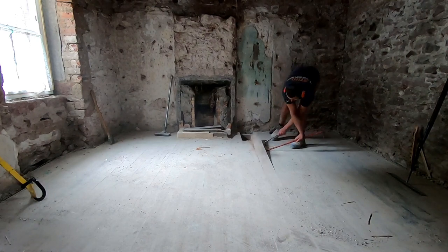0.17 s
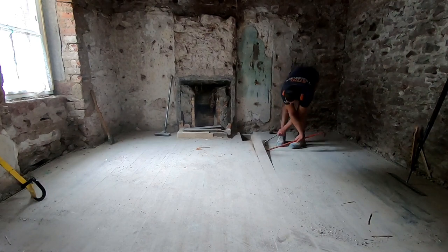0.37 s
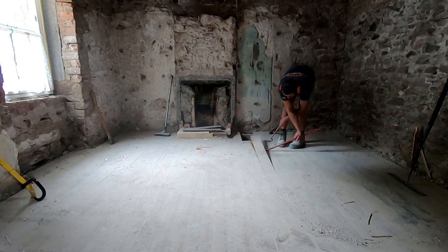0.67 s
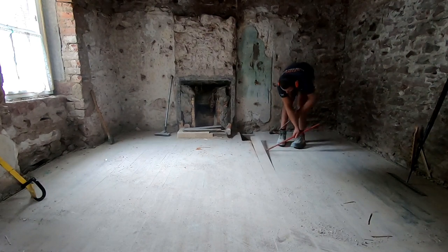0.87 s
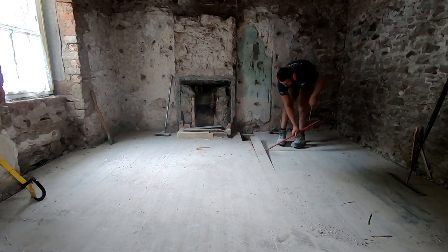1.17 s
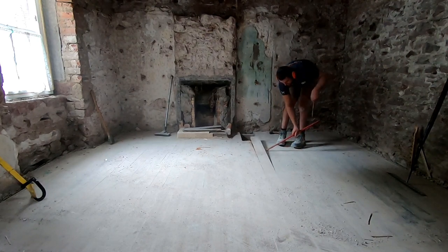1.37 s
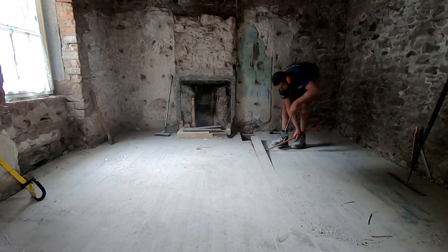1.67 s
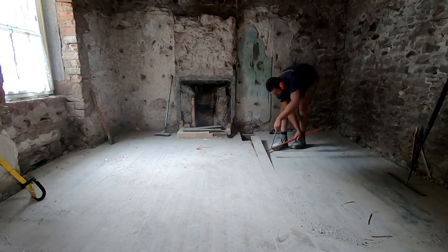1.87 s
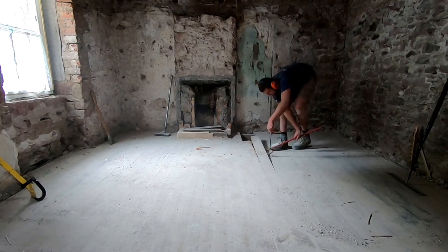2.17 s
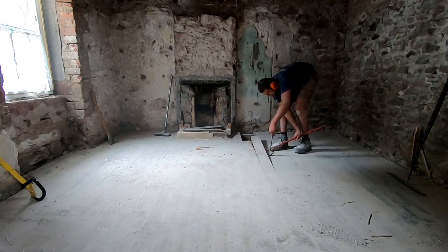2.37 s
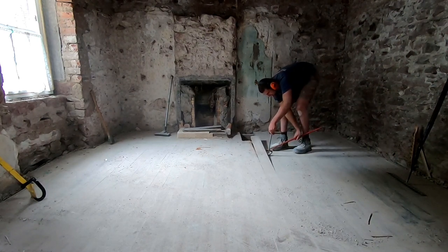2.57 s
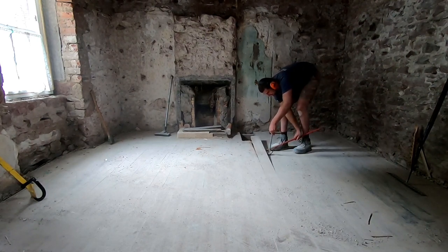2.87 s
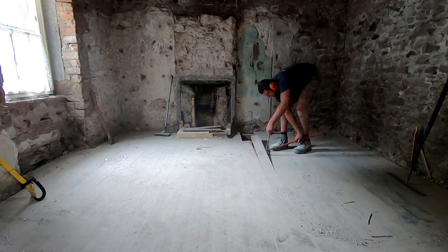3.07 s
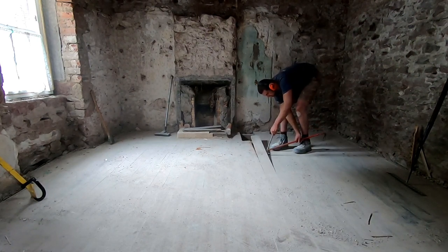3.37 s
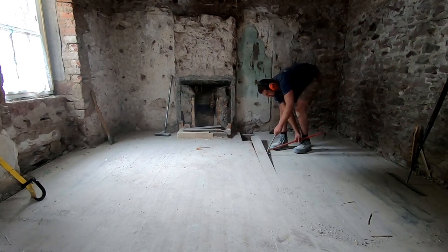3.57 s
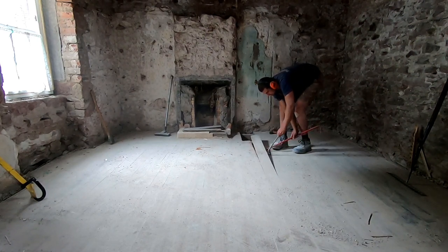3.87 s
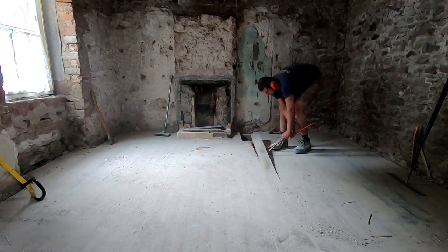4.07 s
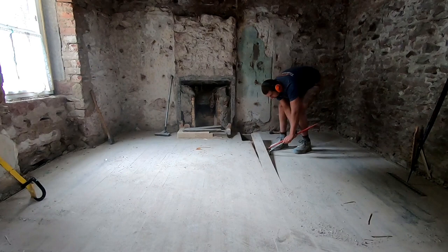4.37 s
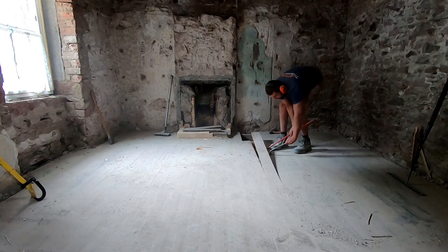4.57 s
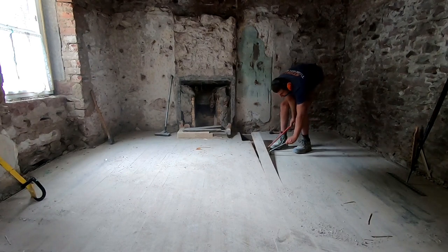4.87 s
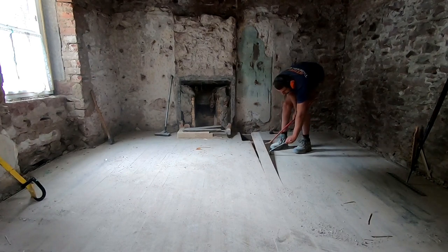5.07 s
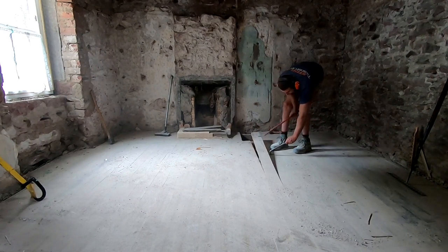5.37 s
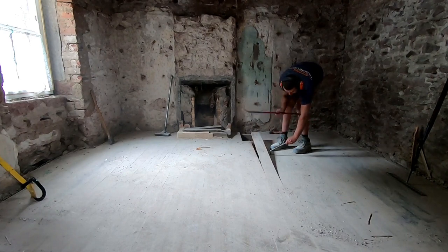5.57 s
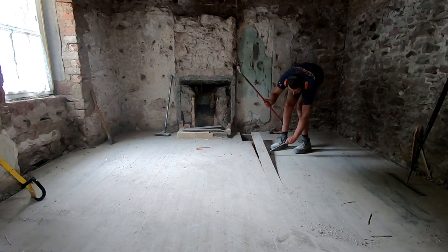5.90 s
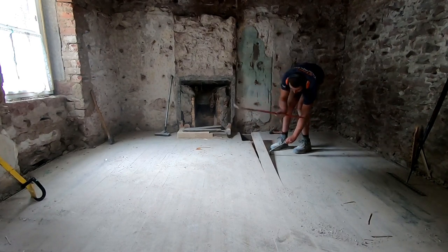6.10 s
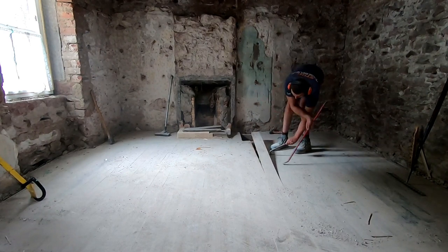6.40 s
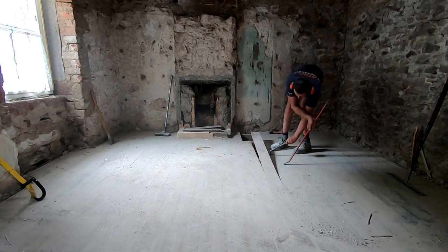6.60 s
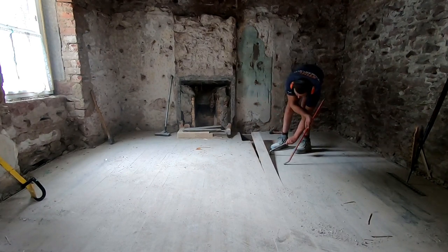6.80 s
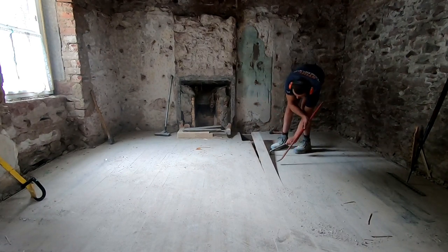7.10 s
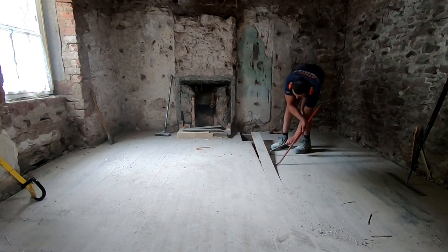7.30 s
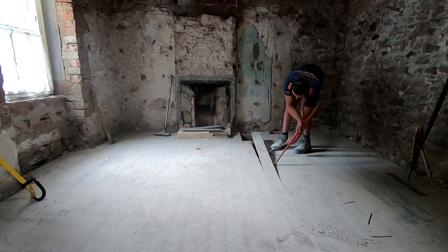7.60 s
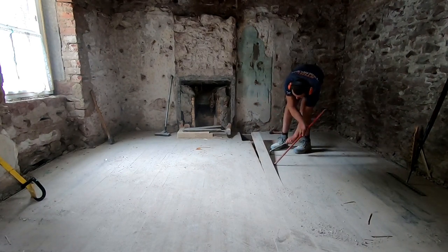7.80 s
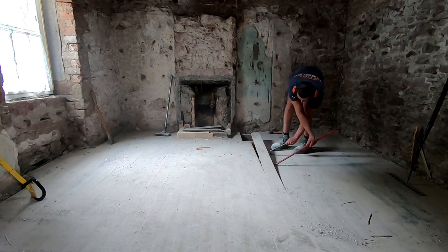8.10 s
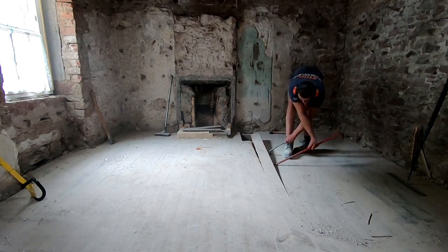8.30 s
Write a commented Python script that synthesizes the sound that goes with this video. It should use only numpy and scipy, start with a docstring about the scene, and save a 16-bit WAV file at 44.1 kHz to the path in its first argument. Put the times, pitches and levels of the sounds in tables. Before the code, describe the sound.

Boots and old floorboards thud hollowly in a bare stone room as a steel crowbar clangs once, knocks, snaps wood and scrapes grit.

```python
"""A bare stone room: old floorboards are levered up with a steel crowbar, a few metres from the microphone.
Boots and boards thud on the joists, wood snaps, the claw scrapes grit; the bar clangs once and rings fainter later.
Blows and slips drive resonances of floor and steel, heard mostly through a synthetic room response;
only the boards' own ring is dry and central. A low machine hum comes through the walls, over still air."""
import sys
import numpy as np
from scipy import signal
from scipy.fft import rfft, irfft, next_fast_len
from scipy.io import wavfile
from scipy.ndimage import map_coordinates

SR = 44100
rng = np.random.default_rng(int(sys.argv[2]) if len(sys.argv) > 2 else 0)


def unload_wav(signal):
    """Save mono or channel-first audio to the path in sys.argv[1] as 16-bit WAV at rate SR, clipped to [-1, 1]."""
    wavfile.write(
        sys.argv[1],
        SR,
        np.round(np.clip(np.atleast_2d(signal).T, -1, 1) * 32767).astype(np.int16),
    )


N = 372644  # length of the scene [samples]
SIZE = 30000  # length of one sound event [samples]
SPREAD_S = .1  # event levels are those of its energy spread over this time
T = np.arange(SIZE) / SR
HZ = np.fft.rfftfreq(SIZE, 1 / SR)
BOARD_HZ = 163  # a typical board's main bending mode

# bounce of the joists: (frequency [Hz], relative level [dB])
JOIST_BOUNCE = [(22, -42), (36, -12), (46, 0.5), (62, 7.5), (78, 0), (105, -3), (135, -12), (220, -90.5)]
# hollow, knock, crack and grit: (centre [Hz], share of a thud [dB], share of a snap [dB])
VOICE_SHARES = [(306, 0.5, -3.5), (824, -2, -1), (2370, 2, 0), (6900, 0.5, -6.5)]


def amp(db):
    """Decibels to gain."""
    return 10 ** (np.asarray(db) / 20)


def along(points, hz):
    """Interpolate (Hz, value) points on a log frequency axis."""
    f, v = np.transpose(points)
    return np.interp(np.log(hz + 1), np.log(f), v)


def colour(points):
    """Causal, minimum-phase response with the given (Hz, dB) shape, by folding its cepstrum."""
    cepstrum = irfft(np.log(amp(along(points, HZ))))
    cepstrum[1:SIZE // 2] *= 2
    cepstrum[SIZE // 2 + 1:] = 0
    return np.exp(rfft(cepstrum))


def delay(s):
    """A pure delay is a phase that turns in proportion to frequency."""
    return np.exp(-2j * np.pi * HZ * s)


def resonance(hz, width):
    """One damped mode, with unit gain at its centre."""
    return 1j * HZ * width / (hz ** 2 - HZ ** 2 + 1j * HZ * width)


def mode(hz, t60):
    """A mode that swells within its first cycles and dies by 60 dB in t60 seconds."""
    ring = resonance(hz, np.log(1000) / np.pi / t60)
    swell = resonance(hz, hz / 2)
    return ring * swell


def at_level(spectrum, db):
    """Scale a sound so that its energy, spread over SPREAD_S, has this level."""
    energy = 2 * np.mean(np.sum(np.abs(spectrum) ** 2, axis=-1)) / SIZE
    return spectrum * amp(db) / np.sqrt(energy / (SPREAD_S * SR) + 1e-30)


def add(track, s, spectrum):
    """Mix a sound into the track from time s on."""
    start = max(round(s * SR), 0)
    track[:, start:start + SIZE] += irfft(spectrum)[:, :max(N - start, 0)]


def filtered(x, gain):
    """A whole track times a gain that depends on frequency."""
    m = next_fast_len(N + 8192)
    return irfft(rfft(x, m) * gain(np.fft.rfftfreq(m, 1 / SR)), m)[..., :N]


def background(hum_hz=95, drift_hz=0.27, hum_db=0.5, air_db=-76):
    """A sine hum with slightly wandering pitch and level, over coloured noise for the quiet air of the room."""
    # machine hum: (time [s], level before hum_db is added [dB])
    hum_levels = [(0.55, -70.5), (1.9, -60), (4.66, -67), (5.05, -60.5), (5.77, -64), (6.22, -59.5),
                  (7.2, -62.5)]
    # still air: (frequency [Hz], relative level per Hz [dB])
    air_shape = [(25, -22.5), (60, 9.5), (110, 2.5), (200, -8), (400, -21), (750, -14), (1500, -22),
                 (3000, -25.5), (6000, -32), (15000, -41)]
    t = np.arange(N) / SR
    drift = map_coordinates(rng.standard_normal(40), [3 * t], mode="nearest")  # three knots a second
    hum = np.sqrt(2) * np.sin(2 * np.pi * np.cumsum(hum_hz + drift_hz * drift) / SR)
    hum *= amp(hum_db + np.interp(t, *np.transpose(hum_levels)))
    # the two sides share the lows and differ more towards the treble
    shared, own = rng.standard_normal(N), rng.standard_normal((2, N))
    air = filtered(shared, lambda hz: amp(along(air_shape, hz)))
    air = air + filtered(own, lambda hz: amp(along(air_shape, hz)) * hz / (hz + 500))
    return hum + amp(air_db) * air / air.std()


def room(direct_db=-14, early_db=-5, early_s=.022, wall_db=-3, wall_s=.012, wall_hz=4500,
         rise_s=0.0028, count=12):
    """Stereo response from one spot on the floor: direct sound, the near walls, a diffuse tail."""
    # decay in the stone room: (frequency [Hz], t60 [s])
    decay = [(50, 0.49), (160, 0.65), (400, 0.49), (1200, 0.51), (3000, 0.46), (6000, 0.42), (12000, 0.34)]
    # left-right likeness: (frequency [Hz], correlation [-1 to 1])
    likeness = [(150, 0.99), (280, 0.99), (500, 0.9), (1000, 0.14), (2000, 0.39), (4000, 0.56),
                (8000, -0.23)]
    hz, t, z = signal.stft(rng.standard_normal((2, SIZE)), SR, nperseg=256)
    dying = z * amp(-60 * t / along(decay, hz)[:, None])
    tail = signal.istft(dying, SR, nperseg=256)[1][:, :SIZE]
    tail *= 1 - np.exp(-T / rise_s)
    tail /= np.sqrt(np.sum(tail ** 2) / 2)
    for port in tail:
        at = (rng.uniform(.1, 1, count) * early_s * SR).astype(int)
        port[at] += amp(early_db) * rng.standard_normal(count) / np.sqrt(count)
    turn = np.arccos(np.clip(along(likeness, HZ), -1, 1)) / 2
    mid, side = rfft(tail) * [np.cos(turn), np.sin(turn)]
    # treble beams out of the gap in the floor and comes back off a hard surface as a bright tick
    wall = amp(wall_db) * HZ / (HZ + wall_hz) * delay(wall_s * rng.uniform(0.84, 1.2, (2, 1)))
    return np.array([mid + side, mid - side]) + amp(direct_db) + wall


def splinters(envelope, rate, spread_db):
    """Tiny slips of random size under an envelope, with energy 1; rate is in slips a second."""
    at = np.flatnonzero(rng.random(SIZE) < rate / SR)
    signs = np.sign(rng.standard_normal(len(at)))
    slips = np.zeros(SIZE)
    slips[at] = signs * amp(-spread_db * rng.random(len(at))) * envelope[at]
    return rfft(slips) / np.sqrt(np.sum(slips ** 2) + 1e-20)


def contact(crunch_db, crunch_s):
    """A blow followed by a short crunch of fibres and dust."""
    return 1 + amp(crunch_db) * splinters(np.exp(-T / crunch_s), rate=1300, spread_db=13.5)


def timber(strength_db=-8, scatter_db=3, shift=0.0062):
    """Each contact excites the resonances in new proportions; the strain on the board shifts them a little."""
    # ring of the boards and the claw wedged in them, before scatter: (centre [Hz], width [Hz], relative level [dB])
    wood_modes = [(292.7, 19, 5.5), (636.5, 71, 2), (752, 56, -1.5), (975, 22, -2), (1160, 58, 2.5),
                  (1331, 7.5, -1.5), (1726, 10, -2.5), (2720, 20, -5), (2990, 15, -0.5)]
    response = 1
    for (hz, width, db), (gain, strain) in zip(wood_modes, rng.standard_normal((len(wood_modes), 2))):
        strained_hz = hz * np.exp(shift * strain)
        response = response + amp(db + strength_db + scatter_db * gain) * resonance(strained_hz, width)
    return response


def board(blow, pitch_hz, t60, db, ring_db=-3, floor_db=-3, floor_hz=158, floor_width=85):
    """A board rings dry on its main bending mode, amid the broad response of the floor to the blow."""
    broad = resonance(floor_hz, floor_width)
    floor = at_level(blow * broad * broad * broad, db + floor_db)
    ring = mode(pitch_hz, t60) * resonance(pitch_hz, pitch_hz)
    return floor + at_level(ring, db + ring_db)


def floor_voices(grit_lag_s=.0022):
    """Responses of hollow, knock, crack and grit; the grit voice sounds 2 ms after the other three."""
    # hollow under the boards, knock, crack, grit; each: (frequency [Hz], relative level [dB])
    hollow_shape = [(130, -52.5), (220, -2.5), (275, 1), (330, 1), (430, -4.5), (560, -14), (800, -28),
                    (1600, -87.5)]
    knock_shape = [(280, -39), (500, -6), (640, 1), (760, 1.5), (860, 5.5), (980, 5), (1300, -3),
                   (1550, -6.5), (2300, -31.5), (5000, -94.5)]
    crack_shape = [(700, -32.5), (1450, -2), (1850, 2), (2400, 1), (3200, -0.5), (4200, -6), (5500, -14),
                   (11000, -70.5)]
    grit_shape = [(2200, -48), (4200, -4), (5200, 1.5), (7000, 0.5), (10000, -3), (15000, -17.5)]
    grit = colour(grit_shape) * delay(grit_lag_s)
    return [colour(hollow_shape), colour(knock_shape), colour(crack_shape), grit]


def answer(blow, voices, levels_db):
    """Each voice answers the same blow at its own level."""
    return sum(at_level(blow * voice, db) for voice, db in zip(voices, levels_db))


def scrapes():
    """Claw and soles stroke the gritty floor: each stroke is a Gaussian swell of slips."""
    # strokes: (centre time [s], standard deviation of the swell [s], level [dB])
    strokes = [(3.037, .016, -75), (3.213, .022, -56), (3.568, 0.027, -56.5), (3.792, 0.061, -55.5),
               (4.051, 0.015, -47.5), (4.165, 0.027, -44.5), (4.631, .035, -55.5), (4.864, 0.026, -64),
               (5.963, .04, -76), (6.448, 0.022, -69), (7.61, 0.018, -59), (8.073, 0.032, -41.5),
               (8.144, 0.03, -51), (8.241, 0.034, -49), (8.42, .011, -53)]
    # tone of a scrape: (frequency [Hz], relative level [dB])
    rasp_shape = [(150, -12.5), (400, -2), (700, -3), (1400, -5.5), (2900, -3.5), (4500, -12),
                  (7000, -11.5), (10000, -14), (15000, -27)]
    track, rasp = np.zeros((2, N)), colour(rasp_shape)
    for s, half, db in strokes:
        lead = np.pi * half  # from the start of the sound to the centre of the swell
        swell = np.exp(-.5 * ((T - lead) / half) ** 2)
        slips = splinters(swell, rate=800, spread_db=43.5)
        add(track, s - lead, at_level(slips * rasp * timber() * room(), db))
    return track


def snaps(board_db=-3, joist_db=-13, pivot_hz=2200):
    """Light, sharp contacts barely stir the joists; the brighter the snap, the less wood and the more grit."""
    # light contacts of the claw and splitting wood: (time [s], crack reference level [dB], brightness [dB/octave])
    cracks = [(.363, -59, 2), (0.938, -75, -2.5), (3.378, -45, 0.5), (3.522, -52, -0.1), (3.647, -50, 0.1),
              (3.879, -59, 5.5), (3.912, -45, 0.04), (4.364, -50, 1.5), (4.578, -59.5, 3), (4.673, -54, 2),
              (4.799, -68.5, 1), (4.972, -67, 0), (5.021, -58, 3), (5.832, -69.5, 3.5), (5.993, -74, 2.5),
              (6.868, -86.5, 4), (7.806, -70, -.5), (8.001, -57.5, 2.5), (8.348, -50.5, -0.5)]
    track, voices, joists = np.zeros((2, N)), floor_voices(), colour(JOIST_BOUNCE)
    centre_hz, _, share_db = np.transpose(VOICE_SHARES)
    for s, db, brightness in cracks:
        touch = contact(crunch_db=-8.5, crunch_s=.014)
        blow = room(direct_db=-12.5) * touch * timber(strength_db=-9, shift=.02)
        wood_db = db + board_db + brightness * np.log2(BOARD_HZ / pivot_hz)
        low = board(blow, BOARD_HZ, t60=.11, db=wood_db)
        low = low + at_level(blow * joists, wood_db + joist_db)
        levels_db = db + share_db + brightness * np.log2(centre_hz / pivot_hz)
        add(track, s, low + answer(blow, voices, levels_db))
    return track


def crowbar(crack_db=-2, board_db=-4.5, joist_db=-4, split=.011, twin_db=-5):
    """Hand-damped steel rings as its tip cracks on the board; bending in two planes pairs its modes closely."""
    # strikes on the bar: (time [s], ring level [dB], ring brightness [dB/octave])
    strikes = [(1.371, -40.5, -2), (4.215, -52, -1), (6.281, -87.5, 4), (6.508, -70, -1)]
    # bending modes of the bar: (frequency [Hz], relative level [dB], t60 [s])
    steel_modes = [(277.8, 0, 0.34), (461, -9, .22), (708, -3.5, .14), (764, -3.5, .12), (1007, -11, .1),
                   (1295, 3.5, 0.28), (1812, 3, 0.078), (2130, -6, 0.14), (2360, -1, 0.21),
                   (2640, -12.5, 0.14), (3160, -14.5, .18), (3255, -26, 0.23), (3520, -21.5, 0.17),
                   (3460, -5.5, .15), (4850, -13, 0.181), (5120, -8.5, 0.24), (6230, -6, 0.15),
                   (6756, -18, .26), (7009, -18.5, .24), (7340, -14.5, .26), (7540, -17, .26),
                   (8450, -19, .28), (8750, -21.5, 0.39), (9600, -18.5, .24), (9450, -25, .22),
                   (10430, -26.5, .22)]
    # crack of the steel tip: (frequency [Hz], relative level [dB])
    tip_shape = [(250, -19), (600, 3.5), (1100, -4.5), (1900, 0), (3300, -2.5), (4300, -13), (6000, -19),
                 (8000, -26.5), (10000, -40.5), (15000, -62)]
    track = np.zeros((2, N))
    pairs = [mode(hz, t60) + amp(twin_db) * mode(hz * (1 + split), t60) for hz, _, t60 in steel_modes]
    lowest_hz = steel_modes[0][0]
    for s, ring_db, bright_db in strikes:
        space = room()
        ring = sum(at_level(space * pair, db + bright_db * np.log2(hz / lowest_hz))
                   for pair, (hz, db, _) in zip(pairs, steel_modes))
        # crack and thump are set relative to the ring
        crack = at_level(space * contact(crunch_db=-6, crunch_s=.02) * colour(tip_shape), crack_db)
        thump = board(space, pitch_hz=195.3, t60=.2, db=board_db)
        thump = thump + at_level(space * colour(JOIST_BOUNCE), board_db + joist_db)
        add(track, s, at_level(ring, ring_db) + amp(ring_db) * (crack + thump))
    return track


def thuds(joist_lag_s=0.0066, gripped_t60_s=.17, free_t60_s=.55, half_free_softness=3.4):
    """Heavy blows bounce the joists as well as the board; a soft sole loses treble that a hard edge keeps."""
    # heavy blows of boots and boards: (time [s], board pitch [Hz], board reference level [dB],
    # softness [dB lost per octave above the board], joists over board [dB], extra boom of the hollow [dB])
    blows = [(.001, 157, -35, 2.5, -7, -1), (.19, 166.2, -33, 3.5, -1.5, -1.5),
             (.27, 132.6, -39, 5, -1.5, 0.5), (.5, 154, -55, 5, -6, -2), (.64, 147.4, -59, 7, -14, -2.5),
             (1.777, 195, -57, 6.5, 9, 0), (1.807, 189, -49.5, 10, 7, -1.5),
             (1.844, 173, -53.5, 6.5, -1, 0.5), (2.058, 155.4, -37.5, 9, -2.5, -0.5),
             (2.178, 152.4, -53, 5.5, -8, -17.5), (2.386, 171, -53.5, 3.5, 11, 0),
             (2.46, 170.5, -45, 11, -1.5, -1), (2.609, 150.8, -42.5, 9, -6.5, 1.5),
             (2.706, 146.5, -52, 9, 0.5, -11), (3.047, 154, -38.5, 8, -11, 0),
             (3.715, 172.5, -48, 4.5, -16, 4), (3.775, 157.5, -51, 6, -7.5, 1),
             (4.078, 160.5, -36, 3, -8.5, -6.5), (4.108, 153.2, -35, 2.5, -4, -6),
             (4.212, 176, -44.5, 2, 0.5, -4.5), (5.116, 147.6, -60, 5, -8, -1.5),
             (6.504, 204, -43, 6, -3.5, 2), (6.6, 174.6, -51.5, 11.5, 7, -8.5),
             (7.281, 173, -37.5, 9, -1, 0), (7.396, 195.6, -42, 10, -4, 8), (7.57, 172.3, -50, 6.5, 1, 4.5),
             (8.061, 173, -50.5, 0.5, -13, -2), (8.187, 171.4, -40, 1.7, -14, -4.5),
             (8.405, 150, -52.5, 1.5, 2, -3)]
    track, voices = np.zeros((2, N)), floor_voices()
    joists = colour(JOIST_BOUNCE) * delay(joist_lag_s)
    centre_hz, share_db, _ = np.transpose(VOICE_SHARES)
    for s, pitch_hz, db, softness, joist_db, hollow_db in blows:
        blow = room() * contact(crunch_db=-4.5, crunch_s=.01) * timber()
        # a board gripped by the claw is damped; the softer the blow, the more freely it rings
        free = softness ** 2 / (softness ** 2 + half_free_softness ** 2)
        t60 = gripped_t60_s + (free_t60_s - gripped_t60_s) * free
        low = at_level(blow * joists, db + joist_db) + board(blow, pitch_hz, t60, db)
        levels_db = db + share_db - softness * np.log2(centre_hz / BOARD_HZ)
        levels_db[0] += hollow_db
        add(track, s, low + answer(blow, voices, levels_db))
    return track


def scene():
    """The room's background and all the work on the floor."""
    return background() + scrapes() + snaps() + crowbar() + thuds()


def record(dry, top_hz=15300):
    """A stereo microphone with a dull top octave, a slight left-right imbalance and a band limit."""
    # microphone colour: (frequency [Hz], gain [dB])
    mic_colour = [(10200, -0.5), (11600, -10.5), (14200, -4.5), (15200, -19)]
    # balance: (frequency [Hz], left minus right [dB])
    balance = [(250, -.3), (600, -2.1), (1200, -1.9), (4000, -.4), (8000, 1.3), (12000, 2.4)]
    sides = np.array([[.5], [-.5]])
    return filtered(dry, lambda hz: amp(along(mic_colour, hz) + sides * along(balance, hz)) * (hz < top_hz))


dry = scene()
out = record(dry)
unload_wav(out)
```